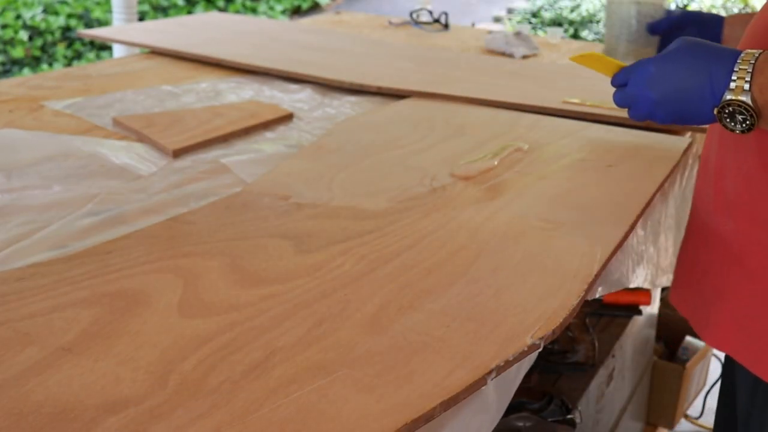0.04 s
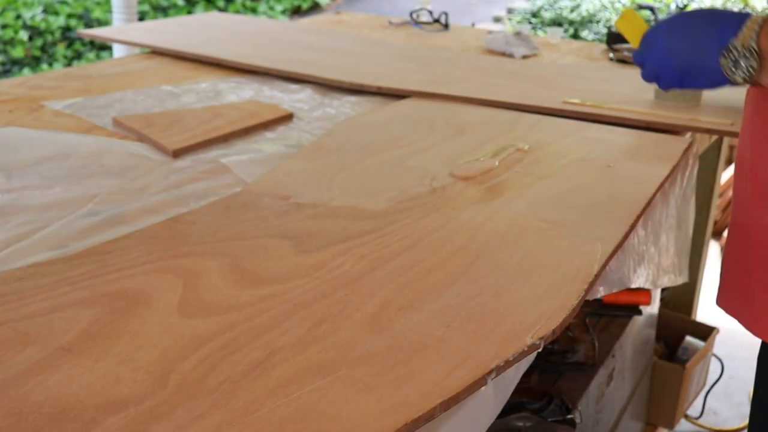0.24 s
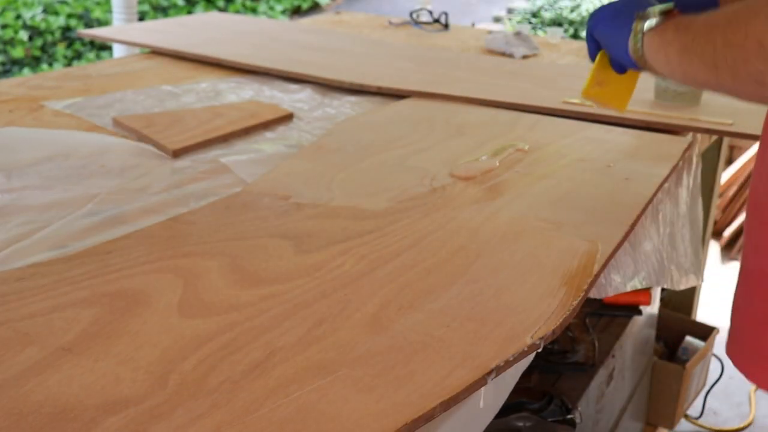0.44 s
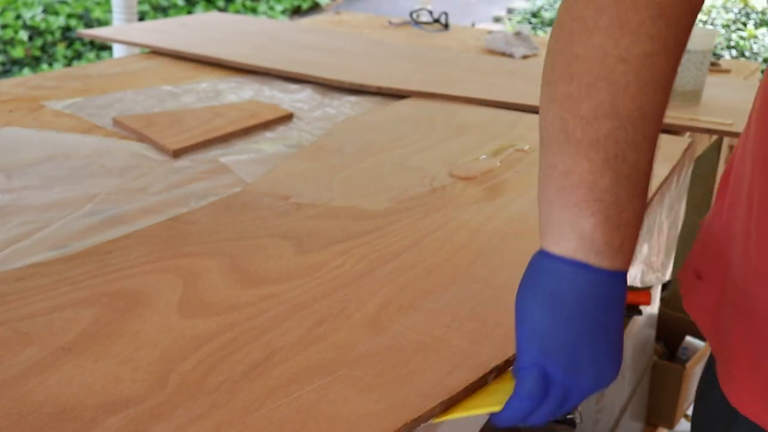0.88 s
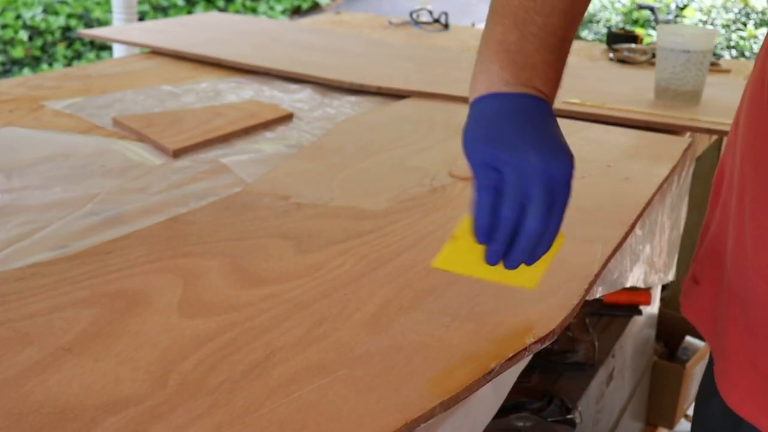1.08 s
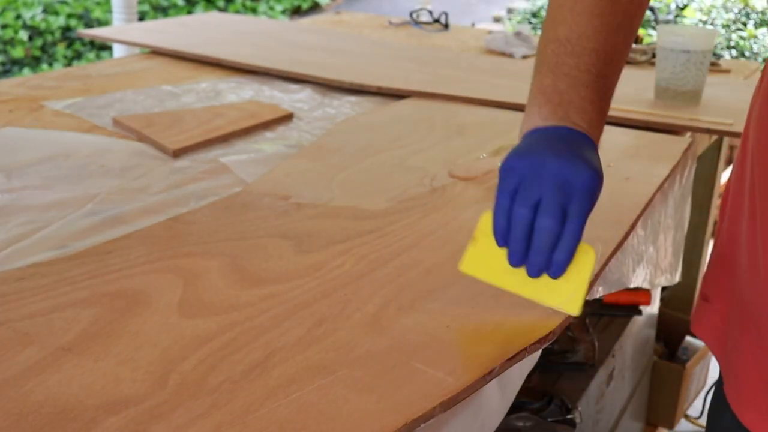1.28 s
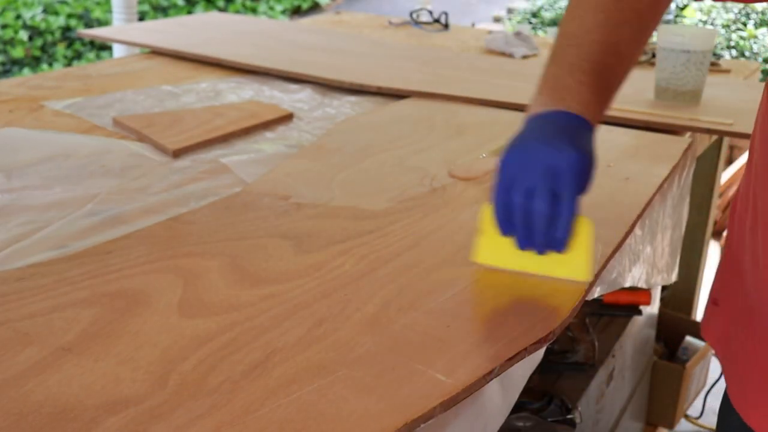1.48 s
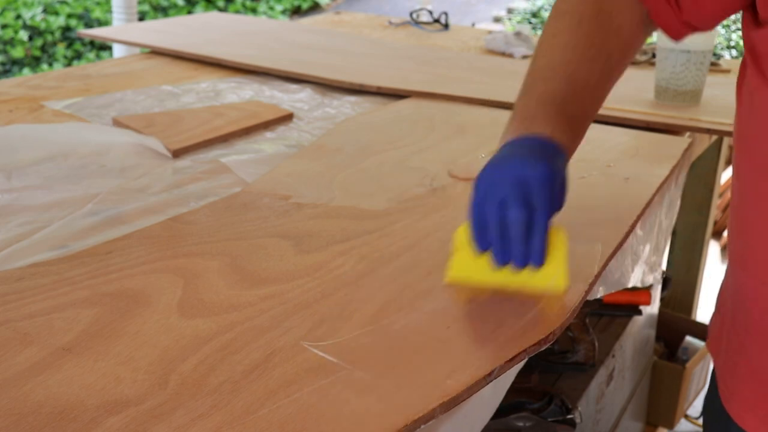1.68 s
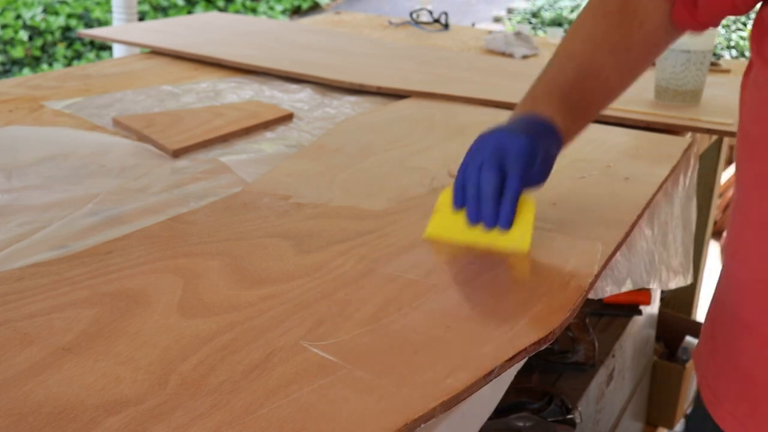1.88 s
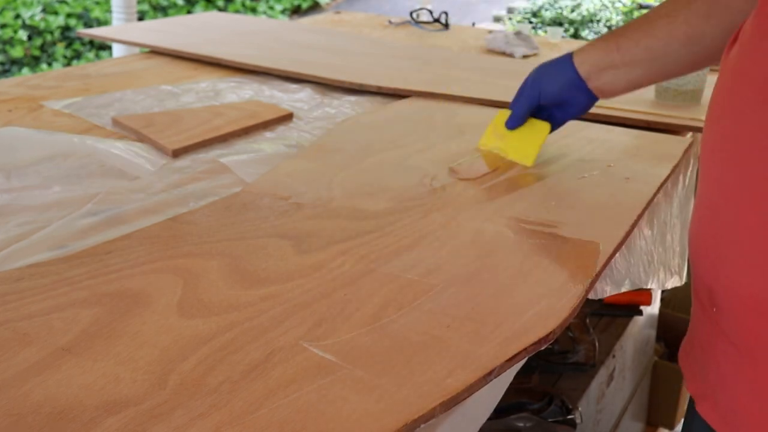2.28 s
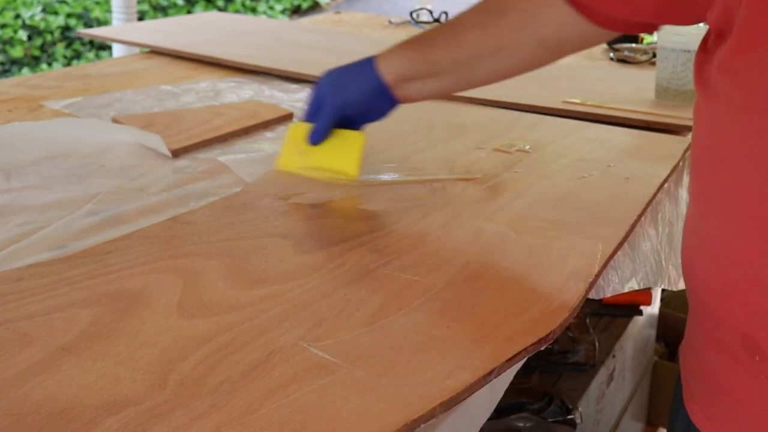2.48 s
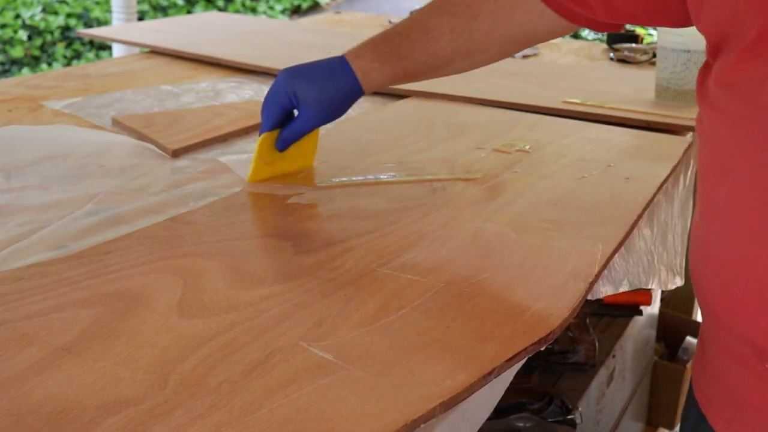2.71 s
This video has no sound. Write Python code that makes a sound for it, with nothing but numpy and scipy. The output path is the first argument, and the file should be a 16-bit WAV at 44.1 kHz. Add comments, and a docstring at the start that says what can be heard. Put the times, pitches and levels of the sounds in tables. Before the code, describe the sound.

A plastic spreader scrapes and taps across plywood in short strokes, with small birds chirping.

```python
"""A plastic mixing cup knocks down on a board, over soft outdoor hiss.
A flexible plastic spreader then taps a plywood panel and is drawn across it through epoxy.
Its edge slips over the grain in tiny jerks that sound in the panel and in the blade.
Small birds repeat a high falling chirp and twitter. An open shelter adds short reflections."""
import sys
import numpy as np
from scipy import signal
from scipy.fft import rfft, irfft, next_fast_len
from scipy.io import wavfile
from scipy.ndimage import map_coordinates

SR = 44100
rng = np.random.default_rng(int(sys.argv[2]) if len(sys.argv) > 2 else 0)


def transcribe(signal):
    """Save signal, clipped to [-1, 1], as a 16-bit WAV file at the path in sys.argv[1]."""
    frames = np.atleast_2d(signal).T
    limited = np.clip(frames, -1, 1)
    pcm = np.round(limited * 32767).astype(np.int16)
    wavfile.write(sys.argv[1], SR, pcm)


N = 125685
TIME = np.arange(N) / SR

# outdoor hiss (frequency [Hz], relative density [dB])
AIR_SPECTRUM = [(18, -55), (30, -32), (263, -6.5), (455, -5), (945, -5), (1400, -7), (2360, -8),
                (4310, -7.5), (6370, -10.5), (15500, -15)]
# thin bird twitters (centre [s], length [s], frequency [Hz], level [dB])
TWITTERS = [(0.94, 0.075, 11400, -40), (1.012, .031, 13900, -33), (1.055, .064, 14400, -36),
            (1.122, 0.034, 13900, -31), (1.161, 0.024, 13800, -33), (1.202, 0.037, 13850, -33),
            (1.37, .07, 13000, -42.5), (2.234, .06, 15000, -40)]
# bird chirps (start [s], top pitch [Hz], level [dB])
CHIRPS = [(1.106, 8930, -29), (1.265, 9100, -30), (1.425, 9070, -27), (1.595, 9076, -28),
          (1.759, 9210, -28), (1.931, 9440, -27.5), (2.286, 9240, -30), (2.662, 9070, -29)]
# contour of a chirp (age [s], pitch / top pitch [ratio], relative level [dB])
CHIRP_SHAPE = [(0, .985, -16), (.007, 1, 0), (.018, .99, 0), (.033, .945, -6), (.048, .89, -4),
               (.062, .855, -9), (.075, .83, -22)]
# chirp partials (frequency / pitch [ratio], relative level [dB])
CHIRP_PARTIALS = [(.5, -22), (1, -0.5), (1.5, -15)]

# resonances of cup on board, plywood panel, blade (frequency [Hz], relative level [dB], T60 [s])
CUP_MODES = [(1013, -14, 0.085), (1262, -10, 0.13), (1549, -7, 0.048), (2220, -27, 0.032),
             (2297, 3.5, 0.033), (2760, -10, 0.036), (2900, -19, 0.037), (3240, -8.5, 0.04),
             (3600, -24, 0.043)]
PANEL_MODES = [(382, -23, 0.057), (585, -16.5, 0.024), (915, -11, 0.046), (1042, -10.5, 0.1),
               (1197, -5, 0.051), (1436, -5.5, 0.046), (1704, -6, 0.036), (1892, -3.5, 0.035),
               (2357, -7.5, 0.032), (3050, -3.5, 0.019)]
BLADE_MODES = [(2180, -5, 0.013), (2760, -3.5, 0.023), (3305, 1, 0.023), (3885, -0.5, 0.033),
               (4540, 2, 0.031), (5770, 4, 0.014)]
# plastic click, dense board modes (frequency [Hz], relative density [dB])
CLICK_SPECTRUM = [(60, -50), (200, -39), (1000, -11), (3000, 5.5), (4500, 3.5), (6000, 6.5), (8000, 1),
                  (11000, 1.5), (15500, 2)]
CLATTER_SPECTRUM = [(100, -51), (400, -20), (1000, 2), (1700, 1), (3200, 0.5), (4500, -7), (6500, -9.5),
                    (15000, -32)]
# decay of the dense board modes (frequency [Hz], T60 [s])
CLATTER_DECAY = [(500, 0.14), (1500, 0.076), (3500, 0.068), (12000, 0.017)]

# spreader hits the wood (time [s], panel level [dB], click level [dB])
TAPS = [(0.3601, -31, -25.5), (0.365, -36, -27), (0.6195, -14.5, -10.5), (0.624, -16.5, -19),
        (0.774, -30, -24), (0.885, -27.5, -31), (1.086, -20, -25), (1.099, -25.5, -14), (1.2341, -7, -15),
        (1.3006, -18, -22), (1.4312, -11.5, -19.5), (1.555, -30.5, -28), (1.661, -23.5, -27),
        (2.0849, -14, -7.5)]
# blade springs free (time [s], pitch [Hz], level [dB])
FLICKS = [(0.6196, 5990, -10), (0.7743, 2870, -10.5), (0.778, 4340, -14), (1.099, 2790, -18),
          (1.661, 2560, -31), (1.889, 3580, -25), (2.0054, 1890, -21), (2.0425, 2000, -27)]
# blade or panel squeaks on one resonance, and a faint handling rustle at 0.435 s (centre [s], length [s],
# frequency [Hz], level [dB])
SQUEAKS = [(0.435, 0.045, 5530, -42), (1.03, 0.16, 1165, -43), (1.045, 0.046, 3470, -34.5),
           (1.09, .05, 551, -38.5), (1.211, .06, 1048, -43), (1.302, 0.042, 3450, -29.5),
           (1.3, 0.039, 4650, -32), (1.477, .06, 3095, -35.5), (1.605, 0.1, 4470, -45.5),
           (1.74, .15, 3150, -47.5), (1.852, .07, 5920, -33), (1.865, 0.076, 6580, -31),
           (1.865, 0.084, 4460, -39.5), (1.853, .07, 1996, -41), (1.853, 0.073, 2600, -44),
           (2.098, 0.034, 924, -38), (2.14, 0.062, 3300, -36.5), (2.16, 0.018, 6520, -33),
           (2.445, 0.091, 3850, -32), (2.521, .06, 8030, -35)]
# reflections off panel, arm and body (delay [s], gain [dB])
BOUNCES = [(.0012, -24), (.0027, -16.5), (.0058, -15.5)]
# the four parts of a scrape (frequency [Hz], relative density [dB])
PANEL_RUB_SPECTRUM = [(50, -42), (150, -33), (350, -5.5), (600, -7), (800, -3), (1150, 4.5), (1800, -1.5),
                      (2800, -3.5), (6000, -56)]
BLADE_RUB_SPECTRUM = [(150, -60), (700, -45), (1500, -17), (2100, -4.5), (2900, -0.5), (3800, 2),
                      (5200, 0.5), (6500, 2), (8500, -7), (15000, -74)]
EDGE_HISS_SPECTRUM = [(500, -60), (2500, -54), (5500, -17), (7800, -1), (9500, 2), (11000, -1),
                      (13000, -6.5), (15700, -8.5)]
FIZZ_SPECTRUM = [(2000, -72), (8500, -47), (10500, -1.5), (12000, 1), (13500, 4), (15700, 5)]
# spreader strokes (start [s], knee [s], end [s], rise to knee [dB], fall from knee [dB],
# panel level [dB], blade level [dB], edge hiss level [dB], fizz level [dB])
STROKES = [(0.593, 0.663, 0.75, -5, 6.5, -47.5, -45, -44, -48),
           (0.777, 0.789, 0.799, 1.5, 13.5, -53, -27, -23.5, -28),
           (0.879, 0.986, 1.04, 16.5, 4, -38, -39.5, -39.5, -37),
           (1.031, 1.095, 1.107, 10, -3, -32, -33, -37, -31),
           (1.21, 1.27, 1.335, 6, 1, -39.5, -37.5, -41.5, -39),
           (1.278, 1.301, 1.315, 8, 8, -33, -29, -51, -47), (1.44, 1.468, 1.547, 4, 7, -53, -34, -40, -38),
           (1.61, 1.715, 1.817, 7, 7, -55, -39, -40.5, -51),
           (1.82, 1.863, 1.895, 2.5, 0.5, -41, -41.5, -34.5, -51),
           (1.89, 1.965, 1.968, 6, -3, -42, -38, -39, -44),
           (1.951, 1.96, 1.968, 12, 1.5, -50, -31.5, -32, -37),
           (2.0089, 2.018, 2.026, 6.5, 8.5, -55, -23.5, -18.5, -22.5),
           (2.09, 2.118, 2.148, 5.5, 4, -59, -28.5, -26, -20),
           (2.143, 2.16, 2.168, 8, 7, -57, -24, -20.5, -19),
           (2.293, 2.328, 2.355, 10.5, 3, -41, -32.5, -30, -59),
           (2.347, 2.414, 2.6, 8, 12, -47, -28.5, -25.5, -45),
           (2.517, 2.584, 2.603, 10.5, 7, -39.5, -35.5, -45, -38),
           (2.734, 2.744, 2.82, -7, 6, -48.5, -42, -39.5, -41),
           (2.791, 2.83, 2.838, 5, 1.5, -47, -37.5, -36, -32)]

KNOCK_S, KNOCK_DB = 0.2442, -8.5


def from_db(db):
    """Decibels to gain."""
    return 10 ** (np.asarray(db) / 20)


def unit_rms(x):
    """Scale to unit power."""
    return x / np.sqrt(np.mean(x ** 2) + 1e-20)


def at_hz(points, hz):
    """Read a table on a log-frequency axis."""
    table_hz, values = np.transpose(points)
    return np.interp(np.log(hz + 1e-3), np.log(table_hz), values)


def colour(x, spectrum):
    """Filter by a spectrum table; unit power."""
    size = next_fast_len(len(x))
    hz = np.arange(size // 2 + 1) * SR / size
    return unit_rms(irfft(rfft(x, size) * from_db(at_hz(spectrum, hz)), size)[:len(x)])


def high_pass(x, hz):
    """Second-order low cut."""
    return signal.sosfilt(signal.butter(2, hz, "high", fs=SR, output="sos"), x)


def drift(corner_hz):
    """Smooth random motion; unit power."""
    pole = np.exp(-2 * np.pi * corner_hz / SR)
    return unit_rms(signal.lfilter([1], [1, -2 * pole, pole * pole], rng.standard_normal(N + SR))[SR:])


def decay(t, t60_s):
    """Exponential fall, 60 dB in t60_s."""
    return np.exp(-np.log(1000) * t / t60_s)


def ring(force, modes):
    """A force drives damped modes of alternating sign."""
    out = 0
    for k, (hz, db, t60_s) in enumerate(modes):
        radius, angle = from_db(-60 / (t60_s * SR)), 2 * np.pi * hz / SR
        feedback = [1, -2 * radius * np.cos(angle), radius * radius]
        out = out + (-1) ** k * from_db(db) * signal.lfilter([.5, 0, -.5], feedback, force + 1e-18)
    return out


def add(out, start_s, sound):
    """Mix a sound in at start_s."""
    i = max(int(start_s * SR), 0)
    out[i:i + len(sound)] += sound[:max(N - i, 0)]


def swells(rows, half_width_at_1k_hz=88):
    """Narrow noisy tones swell and fade; higher ones are broader."""
    out = np.zeros(N)
    for centre_s, length_s, hz, db in rows:
        t = TIME[TIME < length_s]
        narrow = signal.butter(2, half_width_at_1k_hz * np.sqrt(hz / 1000), fs=SR, output="sos")
        re, im = signal.sosfilt(narrow, rng.standard_normal((2, SR // 4)))[:, -len(t):]
        tone = unit_rms(np.real((re + 1j * im) * np.exp(2j * np.pi * hz * t)))
        add(out, centre_s - length_s / 2, from_db(db) * np.sin(np.pi * t / length_s) * tone)
    return out


def air(level_db=-42.5):
    """Steady outdoor hiss."""
    return from_db(level_db) * colour(rng.standard_normal(N), AIR_SPECTRUM)


def shelter(x, first_echo_s=0.0071, t60_s=0.2):
    """Scattered reflections from roof, benches and ground."""
    t = TIME[:SR // 2]
    tail = rng.standard_normal(len(t)) * decay(t, t60_s) * (t > first_echo_s)
    return signal.fftconvolve(x, tail / np.sqrt(np.sum(tail ** 2)))[:N]


def bird_chirps(waver_ratio=0.0064, flutter_db=2.5, echo_s=0.011, echo_db=-9):
    """Near-pure falling chirps, each with a close echo."""
    out = np.zeros(N)
    age_s, pitch_ratio, shape_db = np.transpose(CHIRP_SHAPE)
    t = TIME[TIME < age_s[-1]]
    waver = 1 + waver_ratio * drift(corner_hz=250)
    flutter = from_db(flutter_db * drift(corner_hz=53))
    for start_s, top_hz, db in CHIRPS:
        pitch_hz = top_hz * np.interp(t, age_s, pitch_ratio) * np.interp(start_s + t, TIME, waver)
        phase = 2 * np.pi * np.cumsum(pitch_hz) / SR
        tone = sum(from_db(partial_db) * np.sin(k * phase) for k, partial_db in CHIRP_PARTIALS)
        chirp = from_db(db + np.interp(t, age_s, shape_db)) * tone
        add(out, start_s, chirp)
        add(out, start_s + echo_s, from_db(echo_db) * chirp)
    return out * flutter


def plastic_click(t60_s=0.01):
    """Sharp crack of hard plastic."""
    t = TIME[:SR // 20]
    return colour(rng.standard_normal(len(t)), CLICK_SPECTRUM) * decay(t, t60_s)


def board_clatter():
    """Dense modes of a struck board; the high ones die first."""
    t, hz = TIME[:SR // 6], np.geomspace(150, 15500, 260)
    gain = from_db(at_hz(CLATTER_SPECTRUM, hz)) * np.sqrt(hz)   # offsets the wider spacing up high
    phase, detune = rng.random((2, len(hz), 1))
    mode_hz = hz[:, None] + detune * np.gradient(hz)[:, None]
    partials = np.sin(2 * np.pi * (mode_hz * t + phase))
    envelopes = decay(t, at_hz(CLATTER_DECAY, hz)[:, None])
    return gain @ (partials * envelopes) / np.sqrt(np.sum(gain ** 2))


def cup_knock(click_db=5.5, clatter_db=1.5):
    """The cup hits the board; both ring."""
    out = np.zeros(N)
    add(out, KNOCK_S, ring(signal.unit_impulse(SR // 2), CUP_MODES))
    add(out, KNOCK_S, from_db(click_db) * plastic_click())
    add(out, KNOCK_S, from_db(clatter_db) * high_pass(board_clatter(), hz=1280))
    return from_db(KNOCK_DB) * out


def cup_snap(wall_hz=2430, wall_s=0.00264, wall_db=13.2, thump_s=0.0024, thump_db=-5.5):
    """First violent cycles of the cup wall, with a short low thump from the overloaded input."""
    age_s = np.clip(TIME - KNOCK_S, 0, wall_s)
    wall = from_db(wall_db) * np.sqrt(1 - age_s / wall_s) * np.sin(2 * np.pi * wall_hz * age_s)
    thump = from_db(thump_db) * np.sin(np.pi * np.clip((TIME - KNOCK_S) / thump_s, 0, 1))
    return from_db(KNOCK_DB) * (wall - thump)


def spreader_taps(spot_spread_db=2.5, ring_db=-8.5, clatter_db=-8):
    """The blade clicks and the panel rings; mode levels vary with the spot struck."""
    out = np.zeros(N)
    for time_s, panel_db, click_db in TAPS:
        modes = [(hz, db + spot_spread_db * rng.standard_normal(), t60) for hz, db, t60 in PANEL_MODES]
        add(out, time_s, from_db(panel_db + ring_db) * ring(signal.unit_impulse(SR // 2), modes))
        add(out, time_s, from_db(panel_db + clatter_db) * board_clatter())
        add(out, time_s, from_db(click_db) * plastic_click())
    return out


def blade_flicks(t60_s=0.0098, overtone_ratio=1.65, overtone_db=-9):
    """The blade catches, springs free and rings briefly at a pitch set by its bend."""
    out, kick = np.zeros(N), signal.unit_impulse(SR // 10)
    for time_s, hz, db in FLICKS:
        modes = [(hz, db, t60_s), (hz * overtone_ratio, db + overtone_db, t60_s)]
        add(out, time_s, ring(kick, modes))
    return out


def close_bounces(x):
    """Reflections off panel, arm and body comb the sound."""
    return x + sum(from_db(db) * np.interp(TIME - delay_s, TIME, x, left=0) for delay_s, db in BOUNCES)


def resin_film(x, bands=16, spread_db=1.33):
    """The film thickens and thins; each friction band swells and sinks on its own."""
    size, out = next_fast_len(N), 0
    spectrum, hz = rfft(x, size), np.arange(size // 2 + 1) * SR / size
    centres_hz = np.geomspace(1000, SR / 3, bands)
    for weights in np.eye(bands):
        band = irfft(spectrum * at_hz(np.c_[centres_hz, weights], hz), size)[:N]
        out = out + band * from_db(spread_db * drift(corner_hz=9))
    return out


def blade_flex(x, swing_ratio=0.04):
    """The blade bends under the hand; its resonances glide."""
    speed = 1 + swing_ratio * drift(corner_hz=3)
    return map_coordinates(x, [np.cumsum(speed)], mode="mirror")


def edge_friction(slips_per_s=6000, spread_db=3, smooth_gain=0.7, judder_db=1.65):
    """Tiny random slips over the grain plus smooth rubbing, through resin, with judder."""
    sizes = from_db(spread_db * np.minimum(rng.exponential(1, N), 3.5))
    signs = rng.choice([-1, 1], N)
    slips = unit_rms(sizes * signs * (rng.random(N) < slips_per_s / SR))
    force = resin_film(slips + smooth_gain * rng.standard_normal(N))
    return force * from_db(judder_db * drift(corner_hz=40))


def spreader_scrape(panel_hum_db=-19, blade_ring_db=-5, bite_share=0.061, release_s=0.0066):
    """Friction drives panel, blade, hiss and fizz; each stroke bites, varies in pressure, lifts off."""
    friction = edge_friction()
    panel_rub = colour(friction, PANEL_RUB_SPECTRUM)
    panel_hum = unit_rms(ring(panel_rub, PANEL_MODES))
    panel = unit_rms(panel_rub + from_db(panel_hum_db) * panel_hum)
    blade_ring = unit_rms(blade_flex(ring(friction, BLADE_MODES)))
    blade = unit_rms(colour(friction, BLADE_RUB_SPECTRUM) + from_db(blade_ring_db) * blade_ring)
    hiss, fizz = colour(friction, EDGE_HISS_SPECTRUM), colour(friction, FIZZ_SPECTRUM)
    power = 0
    for start_s, knee_s, end_s, rise_db, fall_db, *part_db in STROKES:
        bite = np.clip((TIME - start_s) / (bite_share * (end_s - start_s)), 0, 1)
        lift = np.exp(-np.clip((TIME - end_s) / release_s, 0, 20))
        pressure = from_db(np.interp(TIME, [start_s, knee_s, end_s], [-rise_db, 0, -fall_db]))
        power = power + (from_db(part_db)[:, None] * bite * lift * pressure) ** 2
    return np.sum(np.sqrt(power) * np.array([panel, blade, hiss, fizz]), axis=0)


def scene(work_reverb_db=-16.5, bird_reverb_db=-5):
    """Work close by, birds farther off, open air behind; mono."""
    impacts = cup_knock() + spreader_taps() + blade_flicks()
    strokes = close_bounces(spreader_scrape() + swells(SQUEAKS))
    work = high_pass(impacts + strokes, hz=129)
    birds = bird_chirps() + swells(TWITTERS)
    background = air()
    reverb = shelter(from_db(work_reverb_db) * work + from_db(bird_reverb_db) * birds)
    return (background + reverb + birds + work + cup_snap())[None]


def record(dry):
    """The knock overloads the input, slightly lopsided; a steep low-pass cuts the top."""
    clip_level, skew, cutoff_hz = 0.83, 0.027, 15750
    ceiling = clip_level * (1 - skew * np.sign(dry))
    clipped = dry / (1 + (dry / ceiling) ** 6) ** (1 / 6)
    return signal.sosfilt(signal.ellip(12, .1, 70, cutoff_hz, fs=SR, output="sos"), clipped)


dry = scene()
out = record(dry)
transcribe(out)
```